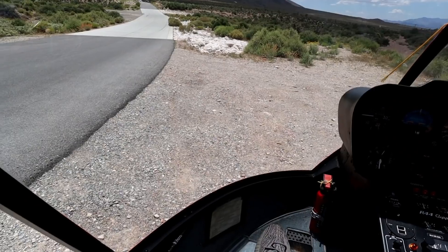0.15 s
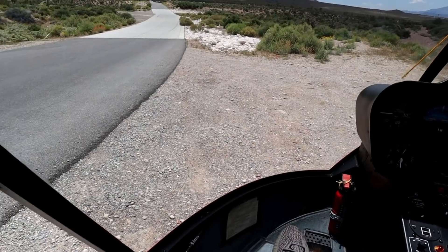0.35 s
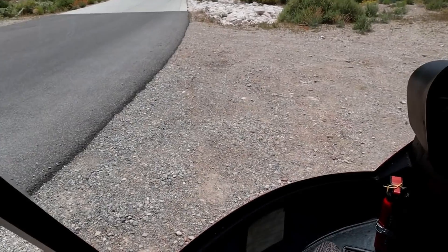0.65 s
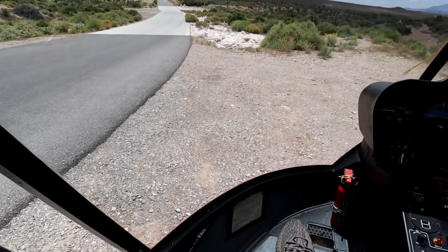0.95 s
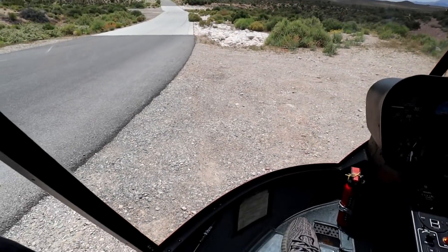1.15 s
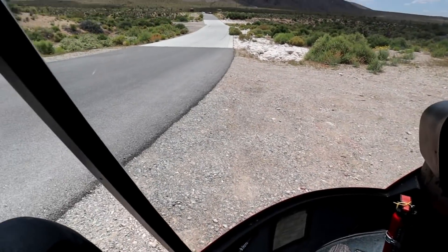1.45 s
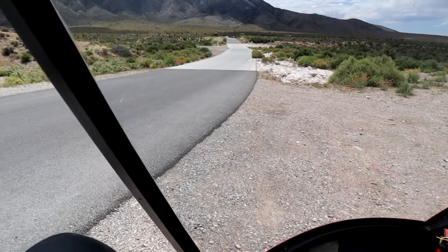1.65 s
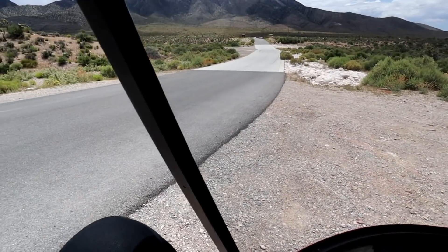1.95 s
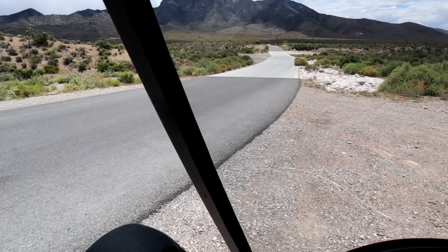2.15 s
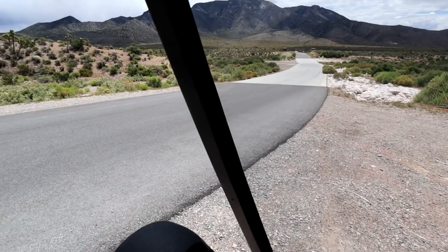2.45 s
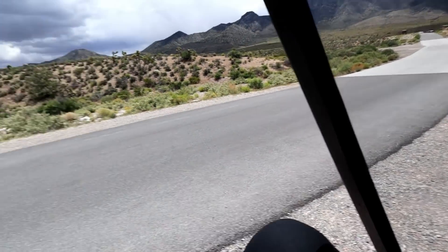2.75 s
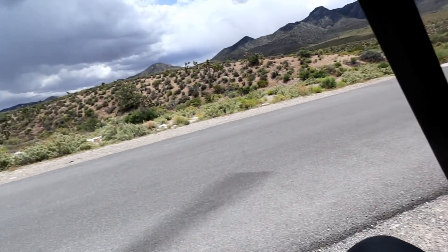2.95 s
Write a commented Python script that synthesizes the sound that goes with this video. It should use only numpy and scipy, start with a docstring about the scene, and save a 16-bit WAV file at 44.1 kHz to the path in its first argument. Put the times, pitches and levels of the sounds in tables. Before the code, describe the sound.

A small piston helicopter from inside the cabin. A faint rush stops at 0.04 seconds; after brief silence, a click at 0.07 starts the full sound abruptly. A low engine drone, buzz and wide roar continue to 3 seconds, with about fourteen falling swishes per second. Buffets come near 0.3, 0.8, 1.6 and 2.3. Blade hiss and chuff grow stronger after 2 seconds as the microphone turns.

```python
"""Inside the cabin of a small piston helicopter flying low.
A faint filtered-noise rush comes first, then a short silence; the cabin sound cuts in with a click.
From there one shaft phase drives the firing drone, the tail rotor's buzz and the main rotor's beat.
Each passing blade pumps a noise roar and adds a two-band swish that falls in pitch, a hiss and a chuff;
now and then a buffet swells and dies away."""
import sys
import numpy as np
from scipy import signal
from scipy.fft import rfft, irfft
from scipy.io import wavfile

SR = 44100
rng = np.random.default_rng(int(sys.argv[2]) if len(sys.argv) > 2 else 0)


def generate_wav(sig):
    """Save sig (samples, or channels by samples) to the path in sys.argv[1] as 16-bit PCM at SR."""
    pcm = np.round(np.clip(np.atleast_2d(sig).T, -1, 1) * 32767).astype(np.int16)
    wavfile.write(sys.argv[1], SR, pcm)


N = 136710
T = np.arange(N) / SR

# Main rotor speed: (time [s], rate [blade passes/s])
ROTOR_SPEED = [(0, 13.96), (.5, 14.05), (1, 14.015), (1.5, 13.93), (2, 13.815), (2.5, 13.75), (3.1, 13.745)]
FIRST_BLADE_S = .134
# Delay of the blade sounds as the microphone turns: (time [s], lag [blade cycles])
BLADE_LAG = [(1, 0), (2, .02), (2.5, .055), (3.1, .14)]
# Crank turns, tail-rotor blade passes and drive-shaft turns per main-rotor blade pass
CRANK_PER_BLADE, TAIL_PER_BLADE, DRIVE_PER_BLADE = 3.324, 5.935, 28.41

# Firing drone before its trim and throb: (time [s], level [dB])
FIRING_LEVEL = [(0.1, -17.5), (0.3, -16), (0.6, -15.5), (0.72, -20.5), (0.85, -16), (1.1, -18), (1.55, -17),
                (1.69, -23.5), (1.8, -17), (2.33, -17.5), (2.5, -21.5), (3.05, -20.5)]
FIRING_ORDER, FIRING_TRIM_DB = 3, -.5  # firings per crank turn
FIRING_WAVER, FIRING_WAVER_HZ = .05, 8
THROB_DEPTH, THROB_AT = .15, .23  # place in blade cycles
# Engine lines besides the firing line: (order [crank multiples], level [dB])
ENGINE_LINES = [(2, -41), (2.5, -42), (4, -39), (5, -32.5), (8, -43), (9, -37.5), (12, -40.5), (16, -47),
                (18, -53)]
# Whine of the drive train: (order [drive-shaft multiples], level [dB])
DRIVE_LINES = [(1, -40), (2, -48.5)]

# Main rotor harmonics before the beat gain: (order [blade-rate multiples], level [dB])
ROTOR_LINES = [(3, -32.5), (4, -36.5), (5, -34), (7, -43), (8, -37), (11, -31.5)]
# Gain of the low rotor beat: (time [s], gain [dB])
BEAT_GAIN = [(.1, -14), (.32, 5.5), (.6, -7.5), (1.0, 4), (1.5, 2), (1.68, -4.5), (2.1, -2), (2.6, -6),
             (3.0, -0.5)]
# Tail rotor harmonics before their gain: (order [tail blade-rate multiples], level [dB])
TAIL_LINES = [(1, -44.5), (2, -30), (3, -32), (4, -37), (5, -52.5), (6, -38)]
# Gain of the tail rotor buzz: (time [s], gain [dB])
TAIL_GAIN = [(.2, 5.5), (.7, -0.5), (1.3, 2), (2, -1), (2.3, -5.5), (2.8, 6), (3.1, -16)]

# Levels of the blade's bite: (time [s], hiss level [dB], chuff level [dB])
BITE_LEVEL = [(.1, -52, -28), (.35, -48, -30), (.8, -44, -36), (1.3, -41.5, -32.5), (1.8, -41, -34),
              (2.25, -38.5, -26.5), (2.55, -36, -28.5), (2.75, -34.5, -23), (3.1, -32.5, -21)]
# Broad hiss of a blade: (frequency [Hz], relative density [dB])
HISS_SPECTRUM = [(1500, -18), (3000, 5), (4000, 6.5), (6300, 4), (8000, 4), (10000, -1.5), (12500, 4.5),
                 (14500, -5), (16000, -16)]
# Lower chuff of a blade: (frequency [Hz], relative density [dB])
CHUFF_SPECTRUM = [(100, -27), (300, -6), (650, -1.5), (1100, -9), (2200, -5.5), (3000, -12), (4000, -19),
                  (8000, -67)]
# Second, lower gust behind each blade, at a steady level: (frequency [Hz], relative density [dB])
GUST_SPECTRUM = [(200, -23), (400, -8.5), (800, -1.5), (1500, -13), (3000, -32), (8000, -57)]
# Places and lengths in blade cycles
HISS_AT, HISS_LENGTH, CHUFF_AT, CHUFF_LENGTH = .01, .115, .05, .1
WAKE_AT, WAKE_LENGTH, GUST_DB = .4, .092, -27

# Whistling bands: (lowest centre before wander [Hz], width of each pole [Hz], level before gain [dB],
# bend of the sweep [1/cycle^2], loudest place [blade cycles], length [blade cycles])
SWISH_BANDS = [(4580, 910, -30.5, 0.81, -0.088, 0.17), (7770, 1300, -39.5, 1.06, -0.028, .17)]
# Gain of the whistling bands: (time [s], lower-band gain [dB], upper-band gain [dB])
SWISH_GAIN = [(.13, -1.5, 0), (.27, -1.5, 1), (.35, 1.5, 1.5), (.42, -5, -3), (.49, -2, -5), (.56, -10, -6),
              (.63, -3, -1), (.78, -6, -2), (.85, -5.5, -4), (.99, -1.5, -3), (1.06, -2, -3), (1.15, -3, 0),
              (1.35, -2, 1), (1.56, -1.5, 0), (1.85, 0, 0.5), (2.14, -1, 2.5), (2.37, 2.5, 1),
              (2.57, -2.5, 2), (2.64, .5, 0), (2.73, -6, 0), (2.86, -5.5, -1), (2.94, -3, 2.5),
              (3.1, -6.5, 5)]
SWEEP_LOW_AT = .12  # blade cycles
BLADE_MISMATCH, PITCH_WANDER, WANDER_HZ = .03, .015, 9  # first two as fractions of the pitch

# Buffets on the canopy: (time of peak [s], level of peak [dB])
BUFFETS = [(.28, -19), (.765, -28.5), (1.644, -23), (2.29, -25)]
# Colour of a buffet: (frequency [Hz], relative density [dB])
BUFFET_SPECTRUM = [(200, -17), (500, 1), (950, 0.5), (1500, -3), (3000, -24), (8000, -45)]
BUFFET_RISE_S = .0065

# Cabin roar: (frequency [Hz], relative density [dB])
ROAR_SPECTRUM = [(20, -24), (42, 0), (90, -6.5), (125, -6.5), (160, 4.5), (190, -1), (230, 2.5), (285, -5),
                 (340, -6), (450, -6.5), (620, -12), (880, -11.5), (1300, -17), (2100, -20), (3000, -26),
                 (4200, -30), (6500, -38.5), (10500, -38), (14000, -46)]
# Roar before grain, lumps, treble gain and pumping: (time [s], level [dB])
ROAR_LEVEL = [(0.1, -18), (0.12, -16), (0.21, -17), (1.22, -19.5), (1.66, -17), (2.13, -18.5), (2.34, -17),
              (2.53, -20.5), (3.05, -19.5)]
# Gain of the roar's treble: (time [s], gain [dB])
TREBLE_GAIN = [(.1, -0.5), (1, -1), (1.8, -1), (2.4, 0), (3.1, 2)]
TREBLE_HZ, FIRING_GRAIN = 1400, .12
# Cabin resonance: (frequency [Hz], relative density [dB])
BOOM_SPECTRUM = [(230, -37), (300, -3), (335, 15.5), (420, 5), (520, 0.5), (800, -32.5)]
# Cabin resonance before surging and pumping: (time [s], level [dB])
BOOM_LEVEL = [(.1, -35.5), (.75, -29.5), (1.1, -31.5), (1.45, -27), (1.68, -24.5), (2.0, -40),
              (2.35, -23.5), (2.5, -25.5), (2.65, -30), (3.1, -25)]
PUMP_DEPTH, PUMP_AT = .06, .14  # place in blade cycles

# Likeness of noise at the microphone pair: (frequency [Hz], coherence [0-1])
LIKENESS = [(80, .9995), (150, .995), (300, .94), (700, .74), (1400, .56), (3000, .76), (5000, .84),
            (9000, .74), (15000, .64)]
# Phase by which left leads right: (frequency [Hz], lead [rad])
LEAD = [(0, 0), (520, -0.1), (950, 0.7), (1290, 1.5), (2150, 2.5), (3450, 3.0), (5080, 2.9), (6890, 3.1),
        (8790, 3.2), (15700, 3.1)]
# Left-right level difference: (frequency [Hz], difference [dB])
BALANCE_DB = [(60, 0.0), (110, 0.0), (200, 0.5), (380, 2.0), (700, 2.5), (1290, 2.5), (2380, 1.0),
              (4400, 3.5), (8120, 1.5), (15000, 1.5)]

# Faint rush before the cabin sound: (frequency [Hz], relative density [dB])
RUSH_SPECTRUM = [(60, -9), (350, -2.5), (900, -10.5), (3500, -19.5), (5000, -26), (14000, -39)]
RUSH_DB, RUSH_END_S = -37, .042
START_S, CLICK_DB, CLICK_DECAY_S = .0705, -5, .0005
ROLL_OFF_HZ, EDGE_HZ = 14600, 15800


def amp(db):
    """Level law: decibels to an amplitude ratio."""
    return 10 ** (np.asarray(db) / 20)


def unit(x):
    """Normalization to a root-mean-square of 1."""
    return x / np.sqrt(np.mean(x ** 2) + 1e-20)


def curve(rows, axis=1):
    """Linear interpolation of one column of a time table at every sample."""
    rows = np.array(rows)
    return np.interp(T, rows[:, 0], rows[:, axis])


def read(rows, hz):
    """Interpolation of a spectrum table on a logarithmic frequency axis."""
    f, value = np.transpose(rows)
    return np.interp(np.log(hz + 1), np.log(f + 1), value)


def drift(hz):
    """Random fluctuation of rms 1: white noise under a Gaussian low-pass of scale hz."""
    f = np.fft.rfftfreq(N, 1 / SR)
    noise = rfft(rng.standard_normal(N))
    return unit(irfft(noise * np.exp(-(f / hz) ** 2), N))


def air(spectrum=((1, 0), (SR, 0))):
    """Partial coherence: turbulent noise reaches two microphones alike in part, with a phase lead."""
    f = np.fft.rfftfreq(N, 1 / SR)
    shared, separate = rfft(rng.standard_normal((2, N)))
    same = np.clip(read(LIKENESS, f), 0, 1)
    tilt = amp(read(BALANCE_DB, f) / 2)
    right = same * shared + np.sqrt(1 - same ** 2) * separate
    right = right * np.exp(-1j * read(LEAD, f))
    pair = np.array([shared * tilt, right / tilt])
    return unit(irfft(pair * amp(read(spectrum, f)), N))


def resonate(x, hz, width):
    """Heterodyned resonance: shift hz down to zero, smooth with a double pole, shift back."""
    turn = np.exp(2j * np.pi * np.cumsum(hz) / SR)
    r = np.exp(-np.pi * width / SR)
    smoothed = signal.lfilter([(1 - r) ** 2], [1, -2 * r, r * r], x / turn)
    return (turn * smoothed).real


def burst(blade, at, length):
    """Periodic modulation: one smooth swell per blade, peaking at a given place in its cycle."""
    return np.exp(-.5 * (np.sin(np.pi * (blade - at)) / (np.pi * length)) ** 2)


def lines(turns, table, waver, waver_hz):
    """Harmonic series of a periodic source, each line wavering in strength and phase."""
    out = np.zeros(N)
    for order, db in table:
        wobble = 1 + waver * (drift(waver_hz) + 1j * drift(waver_hz))
        phase = 2j * np.pi * (order * turns + rng.random())
        out += amp(db) * unit((wobble * np.exp(phase)).real)
    return out


def engine(shaft):
    """Periodic combustion: a firing line throbs with the blades; uneven cylinders add weaker lines."""
    crank = shaft * CRANK_PER_BLADE
    firing = lines(crank, [(FIRING_ORDER, 0)], FIRING_WAVER, FIRING_WAVER_HZ)
    throb = 1 + THROB_DEPTH * np.cos(2 * np.pi * (shaft - THROB_AT))
    drone = firing * throb * amp(curve(FIRING_LEVEL) + FIRING_TRIM_DB)
    return drone + lines(crank, ENGINE_LINES, waver=.18, waver_hz=5.7)


def drive_train(shaft):
    """Rotational whine: a fast shaft geared to the rotor sounds its first two harmonics."""
    return lines(shaft * DRIVE_PER_BLADE, DRIVE_LINES, waver=.17, waver_hz=2.5)


def main_rotor(shaft):
    """Blade-passing tone: harmonics of the blade rate form the low beat."""
    return lines(shaft, ROTOR_LINES, waver=.53, waver_hz=2.9) * amp(curve(BEAT_GAIN))


def tail_rotor(shaft):
    """Blade-passing tone: harmonics of the tail rotor's faster blade rate form the buzz."""
    return lines(shaft * TAIL_PER_BLADE, TAIL_LINES, waver=.35, waver_hz=1.8) * amp(curve(TAIL_GAIN))


def chop(blade):
    """Modulated turbulence: each blade bites with a fluttering hiss, a gritty chuff and a trailing gust."""
    hiss_db = curve(BITE_LEVEL) + 3.5 * drift(120)
    hiss = air(HISS_SPECTRUM) * burst(blade, HISS_AT, HISS_LENGTH) * amp(hiss_db)
    chuff_db = curve(BITE_LEVEL, axis=2) - 1.5 * drift(220)
    chuff = air(CHUFF_SPECTRUM) * burst(blade, CHUFF_AT, CHUFF_LENGTH) * amp(chuff_db)
    gust = air(GUST_SPECTRUM) * burst(blade, WAKE_AT, WAKE_LENGTH) * amp(GUST_DB)
    return hiss + chuff + gust


def swish(blade):
    """Swept resonance: two noise bands fall as a blade swings past; one of two blades sounds lower."""
    place = (blade + .5) % 1 - .5  # within the blade cycle
    mismatch = BLADE_MISMATCH * np.cos(np.pi * np.round(blade))  # alternates from blade to blade
    wander = 1 + PITCH_WANDER * drift(WANDER_HZ) + mismatch
    out = 0
    for column, (hz, width, db, bend, at, length) in enumerate(SWISH_BANDS, 1):
        sweep = 1 + bend * (place - SWEEP_LOW_AT) ** 2
        band = unit(resonate(air(), hz * wander * sweep, width))
        out = out + amp(db + curve(SWISH_GAIN, axis=column)) * band * burst(blade, at, length)
    return out


def buffets():
    """Transient excitation: the downwash slaps the canopy, a quick noise swell that dies away."""
    swell = np.zeros(N)
    for at, db in BUFFETS:
        u = np.maximum((T - at) / BUFFET_RISE_S + 1, 0)  # 1 at the peak
        swell += amp(db) * u * np.exp(1 - u)
    return air(BUFFET_SPECTRUM) * swell


def downwash(blade):
    """Amplitude-modulated turbulence: broadband flow noise roughened at the firing rate."""
    firing_turns = blade * CRANK_PER_BLADE * FIRING_ORDER
    grain = 1 + FIRING_GRAIN * np.cos(2 * np.pi * firing_turns)
    lumps_db = 1.48 * drift(75)
    wash = air(ROAR_SPECTRUM) * grain * amp(curve(ROAR_LEVEL) + lumps_db)
    high_pass = signal.butter(2, TREBLE_HZ, "high", fs=SR, output="sos")
    treble = signal.sosfiltfilt(high_pass, wash)
    return wash + treble * (amp(curve(TREBLE_GAIN)) - 1)


def cabin_resonance():
    """Enclosure resonance: a band of noise surges at random."""
    return air(BOOM_SPECTRUM) * amp(curve(BOOM_LEVEL) + 2.5 * drift(22))


def roar(blade):
    """Blade-rate pumping: each passing blade modulates the downwash and the cabin resonance."""
    pump = 1 + PUMP_DEPTH * np.cos(2 * np.pi * (blade - PUMP_AT))
    return pump * (downwash(blade) + cabin_resonance())


def faint_rush():
    """Stationary noise: a faint coloured rush that stops before the cabin sound."""
    return amp(RUSH_DB) * air(RUSH_SPECTRUM) * (T < RUSH_END_S)


def scene():
    """Superposition of sources locked to one shaft phase, with buffets at their own times."""
    shaft = np.cumsum(curve(ROTOR_SPEED)) / SR  # in blade cycles
    shaft = shaft - np.interp(FIRST_BLADE_S, T, shaft)
    blade = shaft - curve(BLADE_LAG)
    machinery = engine(shaft) + drive_train(shaft) + main_rotor(shaft) + tail_rotor(shaft)
    return machinery + chop(blade) + swish(blade) + buffets() + roar(blade)


def record(dry):
    """Gating and band limiting: rush, silence, then a click and the scene, with a soft top end."""
    on = T >= START_S
    click = amp(CLICK_DB) * on * np.exp(-np.abs(T - START_S) / CLICK_DECAY_S)
    cut = dry * on + click + faint_rush()
    roll_off = signal.butter(4, ROLL_OFF_HZ, fs=SR, output="sos")
    soft = signal.sosfilt(roll_off, cut)
    low_pass = signal.firwin(511, EDGE_HZ, window=("kaiser", 9), fs=SR)
    return signal.oaconvolve(soft, low_pass[None], "same")


dry = scene()
out = record(dry)
generate_wav(out)
```